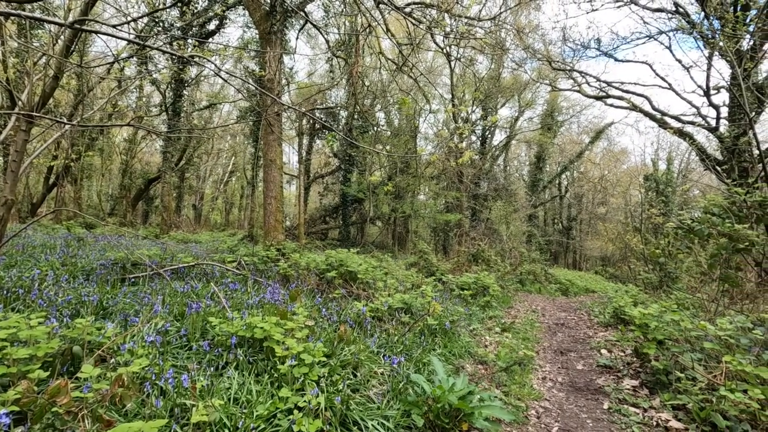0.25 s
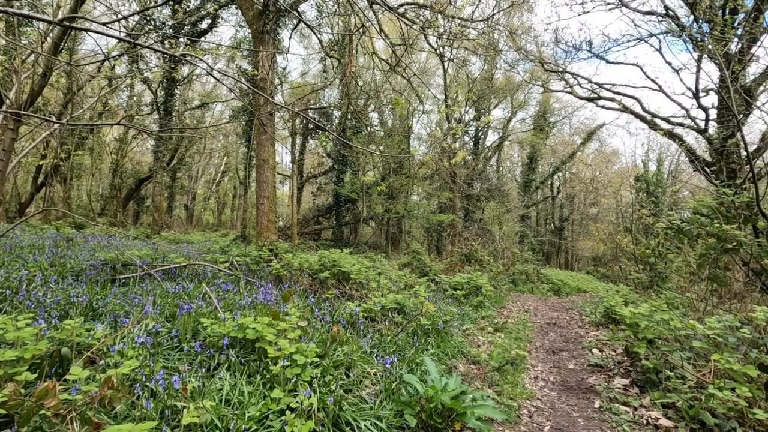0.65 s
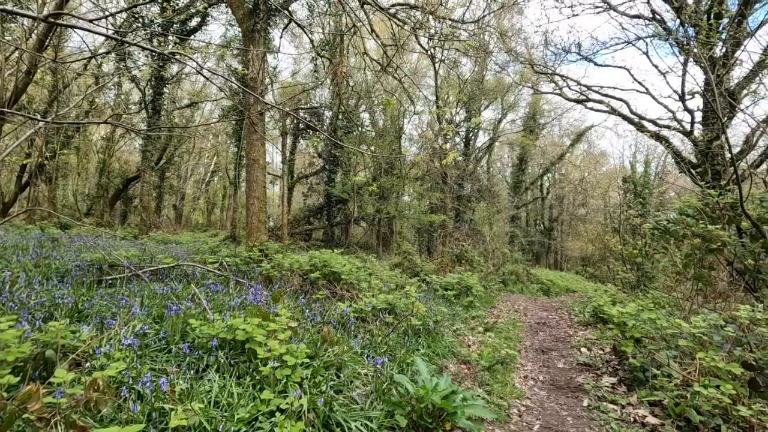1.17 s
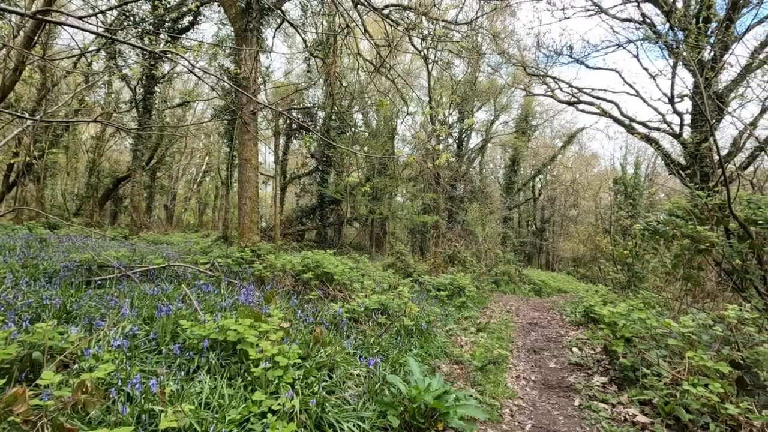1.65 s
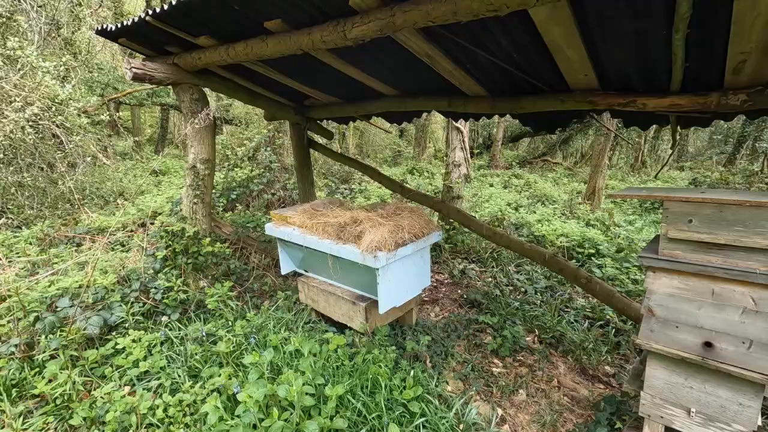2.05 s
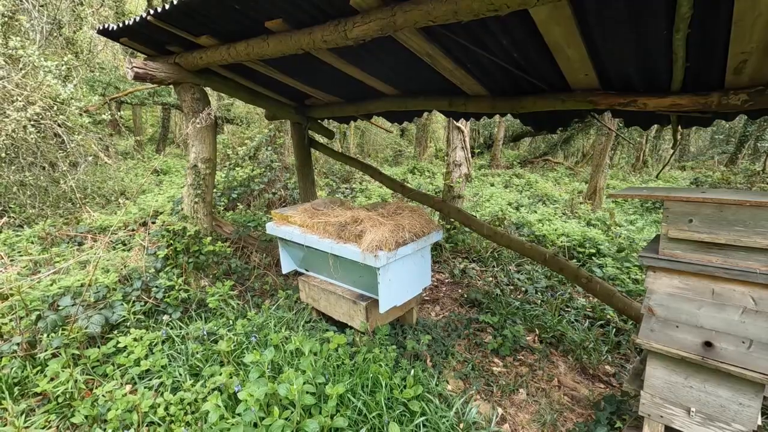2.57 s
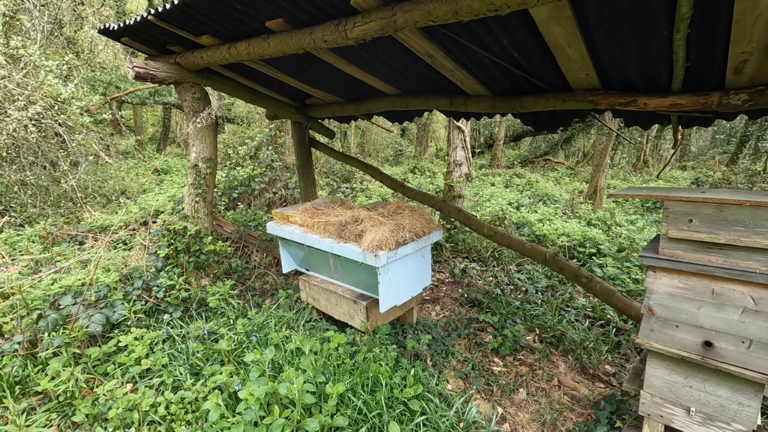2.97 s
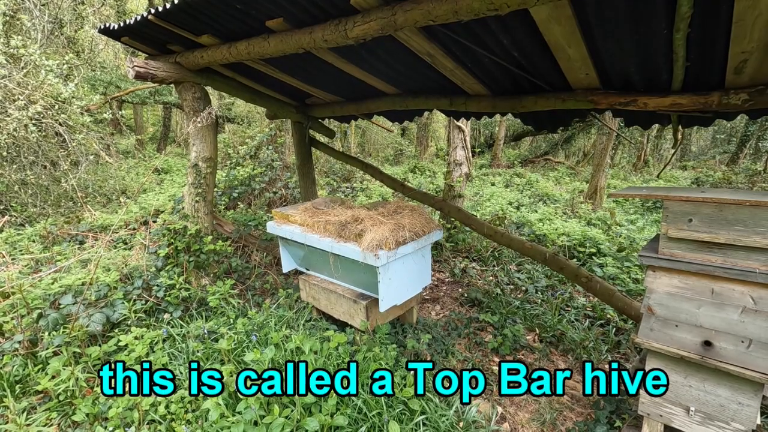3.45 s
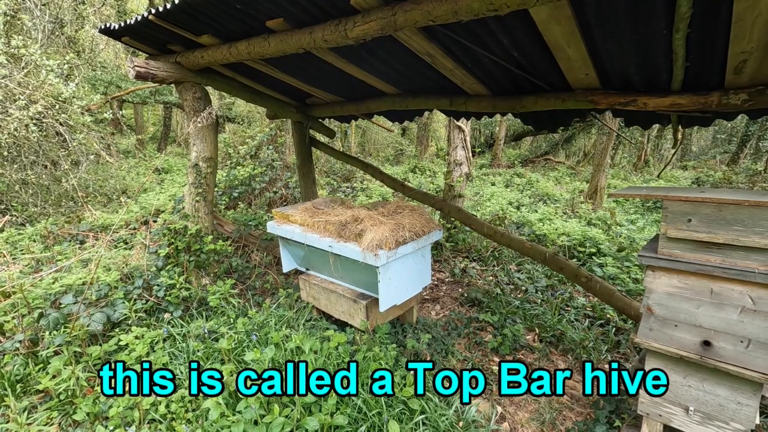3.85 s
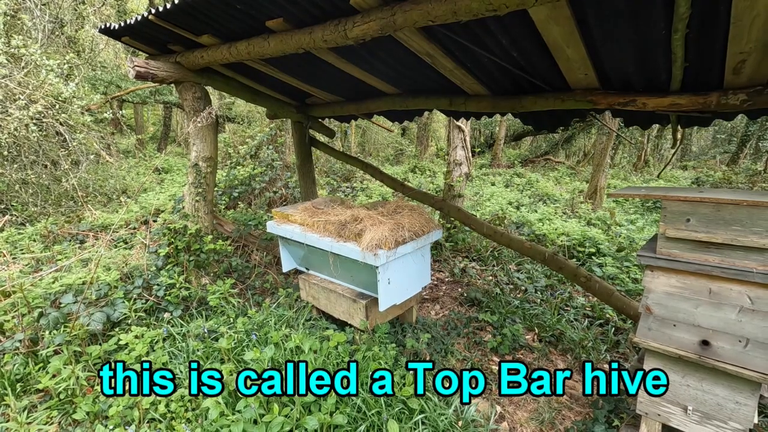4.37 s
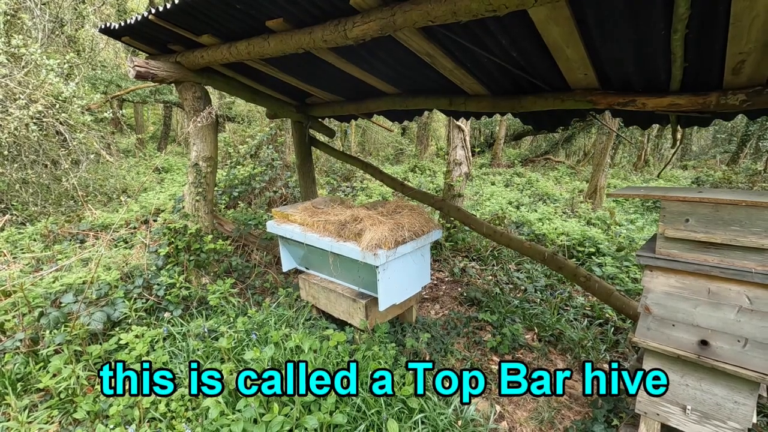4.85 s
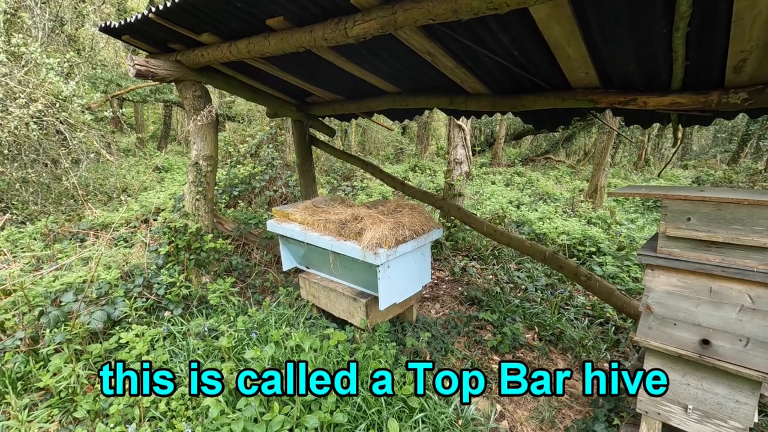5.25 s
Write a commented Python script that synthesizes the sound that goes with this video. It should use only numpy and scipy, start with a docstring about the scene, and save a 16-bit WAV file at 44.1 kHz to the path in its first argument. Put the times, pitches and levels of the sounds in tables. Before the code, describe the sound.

A warbler and other songbirds sing over wind rumble, then cut off, and faint distant birds gradually fade in.

```python
"""Spring woodland, from two microphone positions. At the first a warbler sings close on the left, other
songbirds behind it, while wind rumbles on the microphone. A hard cut lands in a gust. After a short
silence a quieter spot fades in, nearly mono: distant birds, hushed air and a low wavering drone.
Every bird note is one gliding whistle, scattered by trunks and leaves into a soft tail."""
import sys
import numpy as np
from scipy import signal
from scipy.fft import rfft, irfft
from scipy.io import wavfile
from scipy.ndimage import uniform_filter1d

SR = 44100
rng = np.random.default_rng(int(sys.argv[2]) if len(sys.argv) > 2 else 0)


def put_to_file(sound):
    """Save the sound as 16-bit audio at rate SR, in the file named by the first command-line argument."""
    columns = np.atleast_2d(sound).T  # one column per channel
    safe = np.clip(columns, -1, 1)
    whole_steps = np.round(safe * 32767)
    wavfile.write(sys.argv[1], SR, whole_steps.astype(np.int16))


N = 243431
TIME = np.arange(N) / SR


def warbler():
    """Close on the left: single notes, then two syllables, each sung twice with a slight change."""
    # t/s, length/s, f/Hz, level/dB, shape
    single_notes = [ (.123, .021, 3577, -37, "fall"), (.141, .044, 3530, -33.5, "buzz"),
                    (.175, .049, 3452, -29.5, "quiver"), (.213, .034, 3616, -26.5, "rise"),
                    (.236, .05, 3845, -34.5, "flat"), (.671, .044, 4284, -31.5, "arch"),
                    (.744, .03, 2690, -38.5, "rise"), (1.964, .024, 3648, -32.5, "buzz"),
                    (2.025, 0.049, 2590, -42, "buzz")]
    # t/s, pitch ratio, level/dB, syllable
    phrase = [(1.089, 0.98, -33, "two hooks"), (1.204, 0.96, -30.5, "two hooks"),
              (1.361, .995, -26.5, "lift and pip"), (1.478, 1.01, -27, "lift and pip")]
    song = sing(notes(single_notes) + syllables(phrase), warble_hz=68.4, unsteady=.012, rasp=.3)
    return perch(song, direct_db=-2, right_db=-17, scatter_db=-6, echo_db=-12)


def caller():
    """A second bird, a little farther off, gives short sharp calls."""
    # t/s, length/s, f/Hz, level/dB, shape
    calls = [ (.030, .016, 4080, -47, "flick up"), (.045, 0.015, 4930, -41.5, "flick down"),
             (.320, .017, 5500, -40, "rise"), (.644, 0.033, 4934, -44, "rise"),
             (.846, 0.0061, 6100, -54.5, "flick down"), (1.604, 0.0059, 5410, -38.5, "flick up"),
             (1.619, 0.0055, 5480, -37, "flick down"), (1.943, .008, 5940, -54.5, "fall"),
             (1.950, .019, 4887, -35.5, "fall")]
    song = sing(notes(calls), warble_hz=90, unsteady=.018, rasp=.25)
    return perch(song, direct_db=-6, right_db=-7, scatter_db=-8, echo_db=-9)


def treetop_birds():
    """Scattered notes from the canopy, almost central, more echo than direct sound."""
    # t/s, length/s, f/Hz, level/dB, shape
    calls = [ (0, 0.041, 2383, -53.5, "buzz"), (0, 0.16, 5845, -56.5, "fall"),
             (.175, 0.02, 4870, -51.5, "flat"), (.208, .039, 5620, -52.5, "fall"),
             (.228, 0.05, 7400, -62, "rise"), (.472, 0.024, 1766, -54, "buzz"),
             (.490, 0.06, 2496, -45, "swoop"), (.542, 0.038, 3403, -44, "rise"),
             (.548, 0.048, 2274, -50, "buzz"), (.595, .06, 4007, -43.5, "rise"),
             (.772, 0.053, 3414, -43, "rise"), (.868, 0.019, 7400, -59, "flat"),
             (.878, 0.032, 2488, -51.5, "fall"), (1.066, .042, 2590, -57, "flat"),
             (1.360, 0.03, 5510, -56, "rasp"), (1.385, 0.034, 4666, -49, "rasp"),
             (1.430, 0.035, 2646, -47, "flat"), (1.44, 0.081, 6410, -58.5, "rise"),
             (1.645, 0.045, 6800, -59.5, "rise"), (1.705, 0.1, 5820, -60, "fall"),
             (1.845, 0.083, 1840, -60, "flat"), (1.882, .05, 5630, -58, "fall")]
    song = sing(notes(calls), warble_hz=85.2, unsteady=.0099, rasp=.5)
    return perch(song, direct_db=-9.5, right_db=-1, scatter_db=-13, echo_db=-3)


def high_bird():
    """A thin, very high up-down-up whistle on the left, about three times a second."""
    # t/s into the figure, f/Hz, level/dB
    figure = [(0, 7300, -14.5), (.005, 8200, -4), (.010, 9000, -4), (0.02, 8600, -6.5), (.028, 7800, -7.5),
              (0.038, 8300, 0), (0.051, 8420, -6), (.059, 9050, -9.5)]
    # t/s, level/dB, swell time/s
    repeats = [(0.118, -51.5, .003), (.475, -53, 0.0023), (0.811, -61, 0.011), (1.109, -66, 0.0093),
               (1.379, -60, 0.0143), (1.908, -62, 0.013)]
    s, hz, db = np.transpose(figure)
    t = np.arange(int(s[-1] * SR)) / SR
    song = np.zeros(N)
    for start, level_db, swell in repeats:
        pitch = np.interp(t, s, hz) * (1 + .011 * walk(600)[:len(t)])
        envelope = amp(level_db + np.interp(t, s, db)) * np.minimum(t / swell, 1) ** 2
        add(song, start, envelope * whistle(pitch))
    return perch(song, direct_db=-4.5, right_db=-7.5, scatter_db=-8, echo_db=-9)


def distant_birds(fade_db):
    """Birds so far from the second position that they are mostly echo; their chorus follows the fade."""
    # t/s, length/s, f/Hz, level/dB, shape
    calls = [ (2.266, 0.093, 3676, -75, "rasp"), (2.276, .06, 3130, -71, "sink"),
             (2.380, .04, 5480, -78, "rasp"), (2.390, .045, 4830, -73, "sink"),
             (2.530, 0.06, 2870, -83.5, "rise"), (2.612, 0.079, 4340, -73, "buzz"),
             (3.075, 0.16, 6180, -86.5, "flat"), (3.240, .046, 3925, -70, "flat"),
             (3.275, 0.11, 4360, -78, "rasp"), (3.630, 0.097, 4245, -72.5, "buzz"),
             (3.680, 0.2, 7330, -90, "sink"), (3.795, 0.044, 4430, -70.5, "flat"),
             (3.876, 0.056, 3064, -59.5, "buzz"), (3.898, 0.035, 5820, -69.5, "fall"),
             (3.922, 0.086, 4530, -72.5, "fall"), (4.025, 0.057, 5135, -63, "rise"),
             (4.080, 0.022, 2360, -61, "flat"), (4.220, 0.064, 4270, -72.5, "rasp"),
             (4.298, 0.13, 5750, -66, "rasp"), (4.440, .06, 7500, -77, "flat"),
             (4.475, .043, 4800, -70.5, "rasp"), (4.606, .042, 2685, -67, "fall"),
             (4.705, 0.062, 4700, -63, "buzz"), (4.810, .07, 5530, -58, "swoop"),
             (4.850, 0.036, 4040, -60.5, "buzz"), (4.878, 0.034, 5000, -56.5, "buzz"),
             (4.920, 0.092, 4630, -60.5, "rasp"), (4.958, 0.042, 3900, -58.5, "buzz"),
             (5.026, 0.036, 4500, -56, "buzz"), (5.060, 0.0318, 2846, -50.5, "buzz"),
             (5.100, .04, 2725, -54, "flat"), (5.110, 0.047, 5810, -63, "buzz"),
             (5.230, .061, 5120, -66.5, "quiver"), (5.245, .08, 6900, -66, "flat"),
             (5.355, 0.04, 5260, -65, "flat"), (5.360, .08, 7230, -66, "buzz"),
             (5.435, .077, 4600, -62, "rasp"), (5.474, 0.029, 3060, -55.5, "sink"),
             (5.498, 0.034, 2540, -54, "swoop")]
    # t/s, pitch ratio, level/dB, syllable
    phrase = [(2.787, 1.01, -70, "three steps"), (3.045, .99, -68, "three steps")]
    song = sing(notes(calls) + syllables(phrase), warble_hz=74.97, unsteady=.016, rasp=.628)
    crowd = amp(fade_db - 12) * chorus(low_hz=2400, high_hz=7800, count=220)
    echo, echo_side = trees(amp(-1.5) * song + crowd, near_t60=.62, far_t60=.76, far_db=-12)
    return amp(-7) * foliage(song, blur_s=.012) + spread(echo, echo_side, side_db=-26)


def notes(table):
    """Give each note the pitch arc and warble of its shape."""
    # shape: first / middle pitch, last / middle pitch, warble depth/Hz
    shapes = {"flat": (0.96, 1.015, 8), "rise": (.92, 1.07, 7.2), "fall": (1.1, .93, 7.96),
              "buzz": (1.03, 0.91, 212), "rasp": (1, 1.02, 650), "quiver": (1.01, 0.98, 150),
              "sink": (1.04, .975, 6.8), "swoop": (1.15, 0.99, 40), "arch": (.82, .68, 5),
              "flick up": (.7, 1.33, 0), "flick down": (1.33, .72, 0)}
    return [(s, length, hz * shapes[shape][0], hz, hz * shapes[shape][1], db, shapes[shape][2])
            for s, length, hz, db, shape in table]


def syllables(table):
    """Spell out each syllable as notes, shifted in time, pitch and level."""
    # syllable: t/s into it, length/s, first f/Hz, middle f/Hz, last f/Hz, level/dB, warble depth/Hz
    repertoire = { "two hooks": [(0, .009, 2880, 3580, 4350, -10.5, -0.5),
                  (.005, .031, 4100, 3186, 3190, -4, 10), (.025, .018, 3200, 3780, 4250, -17, -3.5),
                  (.036, .033, 4270, 3654, 3424, -0.5, 5)],
                  "lift and pip": [(0, 0.027, 2716, 3090, 3330, -15.5, 1.5),
                  (.015, .018, 3236, 3375, 2930, -3.5, 24.5), (.042, .022, 3430, 3500, 3410, -0.5, -2.5)],
                  "three steps": [(0, 0.027, 4730, 4785, 4760, -6.5, 1),
                  (.024, .063, 3634, 3855, 3920, 1.5, 77.5), (.103, .054, 3220, 3120, 3130, -2.5, 298.5)]}
    return [(s + offset, length, first * ratio, middle * ratio, last * ratio, db + note_db, depth)
            for s, ratio, db, name in table
            for offset, length, first, middle, last, note_db, depth in repertoire[name]]


def sing(score, warble_hz, unsteady, rasp):
    """Each note arcs through three pitches, swells and dies; the deeper its warble, the more it rasps."""
    track = np.zeros(N)
    waver = 1 + unsteady * walk(400)
    flutter = rasp * walk(700)
    for start, length, first, middle, last, db, depth in score:
        t = np.arange(int(max(length, .004) * SR)) / SR
        progress = t / t[-1]
        now = (int(start * SR) + np.arange(len(t))) % N
        arc = np.polyval(np.polyfit([0, .5, 1], [first, middle, last], 2), progress)
        warble = depth * (np.sin(2 * np.pi * warble_hz * t) + flutter[now])
        envelope = amp(db) * np.abs(np.sin(np.pi * progress)) ** .54
        add(track, start, envelope * whistle((arc + warble) * waver[now]))
    return track


def whistle(hz, octave_db=-58):
    """The syrinx: a nearly pure tone with a very faint octave, rms 1."""
    phase = 2 * np.pi * np.cumsum(hz) / SR
    return np.sqrt(2) * (np.sin(phase) + amp(octave_db) * (hz < SR / 5) * np.sin(2 * phase))


def perch(song, direct_db, right_db, scatter_db, echo_db):
    """A bird left of the microphone: weaker on the right, its echo from all round, dulled by leaves."""
    direct = amp(direct_db) * song + amp(scatter_db) * foliage(song, blur_s=.015)
    dull = signal.sosfilt(signal.butter(2, 7200, fs=SR, output="sos"), song)
    mid, side = trees(dull, near_t60=.41, far_t60=1, far_db=-12)
    echo = amp(echo_db - 1) * spread(mid, side, side_db=-5)
    return direct * amp([[0], [right_db]]) + echo * amp([[0], [-2]])


def foliage(song, blur_s):
    """Twigs and leaves beside the direct path: early scatter that roughens each note."""
    t = np.arange(SR // 20) / SR
    response = rng.standard_normal(len(t)) * np.exp(-t / blur_s)
    return signal.fftconvolve(song, response / np.sqrt(np.sum(response ** 2)))[:N]


def trees(song, near_t60, far_t60, far_db):
    """Two unrelated echoes of a song: nearby trunks answer quickly, the deep wood lingers."""
    t = np.arange(SR) / SR
    decay = amp(-60 * t / near_t60) + amp(far_db) * amp(-60 * t / far_t60)
    trunks = rng.standard_normal((2, SR)) * amp(2.3 * rng.standard_normal((2, SR)))
    response = trunks * decay * np.minimum(t / .0031, 1)
    response /= np.sqrt(np.sum(response ** 2, axis=1, keepdims=True))
    return signal.fftconvolve(song[None], response, axes=1)[:, :N]


def wind(level_db=-41.5, easing_db_per_s=2):
    """Wind on the microphone: a rumble that slowly eases, and three gusts that shove it."""
    # Rumble spectra, mid and side: f/Hz, relative level/dB
    mid_spectrum = [(20, 4.5), (33, -1.5), (72, -2.5), (92, -11.5), (134, -18), (200, -20.5), (300, -22.5),
                    (500, -40.5), (830, -49), (1080, -41.5), (1500, -46.5), (2200, -48)]
    side_spectrum = [(20, 3.5), (60, -20), (130, -17), (300, -22.5), (550, -39), (1100, -39.5), (2200, -41)]
    # t/s, half length/s, f/Hz, level/dB, lean to the left (-1..1)
    gusts = [(0.138, .05, 36, -39.5, -0.27), (1.964, .026, 18, -30, -.3), (2.029, 0.023, 26, -22, 0.17)]
    strength = amp(level_db - easing_db_per_s * TIME + .92 * walk(14))
    rumble = strength * spread(air(mid_spectrum), air(side_spectrum), side_db=-10.5)
    for s, half, hz, db, lean in gusts:
        t = TIME - s
        shove = amp(db) * np.cos(2 * np.pi * hz * t) * np.exp(-(t / half) ** 2)
        rumble += shove * np.array([[1 + lean], [1 - lean]])
    return rumble


def low_drone(peak_hz=88.8, sag_hz_per_db=.5):
    """A deep, unsteady tone that swells and sinks, flatter when weak, with a dull rumble under it."""
    # t/s, level/dB
    swells = [(3.34, -93.5), (3.374, -72.5), (3.688, -69), (3.714, -52.5), (3.746, -49), (3.778, -60.5),
              (3.86, -65), (3.884, -52), (4.17, -72.5), (4.202, -61), (4.462, -54), (4.48, -60),
              (4.54, -56.5), (4.62, -76)]
    # f/Hz, relative level/dB
    rumble_spectrum = [(25, 1.5), (55, 4), (130, -7), (250, -36)]
    s, levels = np.transpose(swells)
    db = np.interp(TIME, s, levels)
    hz = (peak_hz - sag_hz_per_db * (db.max() - db)) * (1 + .1 * walk(60))
    soft_gate = uniform_filter1d(1. * (TIME > s[0]) * (TIME < s[-1]), size=1500)
    strength = amp(db + .5) * soft_gate
    tone = np.sqrt(2) * np.sin(2 * np.pi * np.cumsum(hz) / SR)
    rumble = amp(-3.5) * uniform_filter1d(strength, size=12000) * air(rumble_spectrum)
    return strength * tone + rumble


def chorus(low_hz, high_hz, count):
    """Many birds far off: short slurs at random times and pitches, the high ones weaker; rms 1."""
    when, pitch, slur, length, weakness = rng.random((count, 5)).T
    middle = low_hz + (high_hz - low_hz) * pitch
    glide = .28 * (slur - .5) * middle
    start = (np.arange(count) + when) / count * N / SR
    db = -5 * weakness - 10 * pitch
    score = zip(start, .03 + .05 * length, middle - glide, middle, middle + glide, db, 350 * length)
    return unit(sing(score, warble_hz=79.8, unsteady=.02, rasp=.6))


def leaf_hiss():
    """A fine, wide hiss of leaves around the first position."""
    # f/Hz, relative level/dB
    spectrum = [(1500, -5.5), (2200, 1.5), (4000, 3.5), (7000, -3), (10000, -15), (11800, -6.5),
                (13000, -19), (15000, -24)]
    return spread(air(spectrum), air(spectrum), side_db=-3.5) * amp(-74.5 + walk(4.1))


def hushed_air(fade_db):
    """Soft, low air at the second position, nearly mono, its level wavering."""
    # f/Hz, relative level/dB
    spectrum = [(20, 29.5), (45, 18.5), (95, 10), (150, 4.5), (220, 6.5), (370, -2), (540, 1), (640, -9),
                (900, -10), (1250, -3), (1900, -12), (7600, -25.5), (9000, -32), (14500, -33)]
    return spread(air(spectrum), air(spectrum), side_db=-25.5) * amp(fade_db + 12 + 1.3 * walk(6.9))


def hum():
    """A hum in the air: a few narrow, wandering tones, rms 1."""
    # f/Hz, width/Hz, relative level/dB
    tones = [(188, 24, -7), (234, 20, -1.5), (278.7, 25, -5), (428, 36, -3), (481, 25, -1), (539, 23, -5.5)]
    return unit(sum(amp(db) * np.real((walk(width) + 1j * walk(width)) * np.exp(2j * np.pi * hz * TIME))
                    for hz, width, db in tones))


def air(spectrum):
    """Turbulent noise of a given colour, rms 1."""
    hz, db = np.transpose(spectrum)
    bins = np.maximum(np.fft.rfftfreq(N, 1 / SR), 1)
    gain = amp(np.interp(np.log(bins), np.log(hz), db)) * (bins > hz[0] / 2) * (bins < hz[-1])
    return unit(irfft(rfft(rng.standard_normal(N)) * gain, N))


def walk(rate):
    """A random drift that turns rate times a second."""
    steps = np.arange(0, 7, 1 / rate)
    return np.interp(TIME, steps, rng.standard_normal(len(steps)))


def spread(mid, side, side_db):
    """Mid and side to left and right."""
    return mid + amp(side_db) * side * np.array([[1], [-1]])


def add(track, start_s, sound):
    """Mix a sound into a track from a given time."""
    at = int(start_s * SR) + np.arange(len(sound))
    inside = (at >= 0) & (at < N)
    track[at[inside]] += sound[inside]


def amp(db):
    """Decibels to gain."""
    return 10 ** (np.asarray(db) / 20)


def unit(x):
    """Scale to rms 1."""
    return x / np.sqrt(np.mean(x ** 2))


def by_the_path():
    """First position: singers near and far, the microphone in the wind."""
    singers = warbler() + caller() + treetop_birds() + high_bird()
    crowd = trees(chorus(low_hz=2410, high_hz=5880, count=110), near_t60=.24, far_t60=1.1, far_db=-1)
    return singers + amp(-72.5) * crowd + wind() + leaf_hiss()


def deep_in_the_wood(rise_db_per_s=8, full_at_s=5.023):
    """Second position: distant birds and the drone, over a background that rises steadily, then holds."""
    fade_db = -62.5 - rise_db_per_s * np.maximum(full_at_s - TIME, 0)
    return distant_birds(fade_db) + hushed_air(fade_db) + amp(fade_db - 5) * hum() + low_drone()


def scene():
    """The first position stops dead in mid-gust; the second eases in after a short silence."""
    cut_s, resume_s, ease_s = 2.047, 2.245, .035
    ease_in = np.clip((TIME - resume_s) / ease_s, 0, 1)
    return by_the_path() * (TIME < cut_s) + deep_in_the_wood() * ease_in


def record(dry):
    """The recorder cuts the treble above 15.3 kHz."""
    return signal.sosfilt(signal.ellip(8, .2, 70, 15300, fs=SR, output="sos"), dry)


dry = scene()
out = record(dry)
put_to_file(out)
```